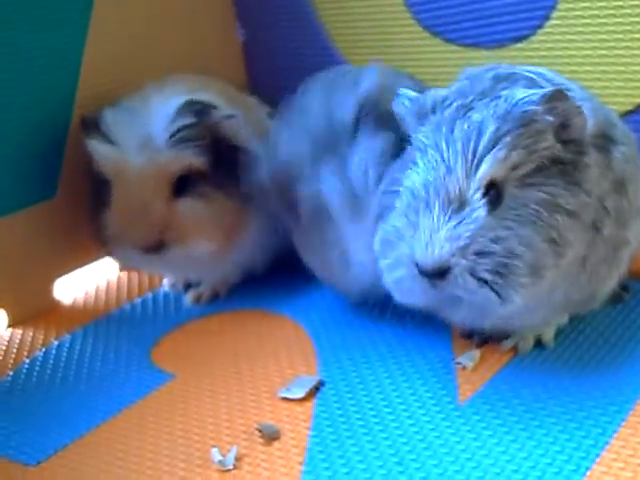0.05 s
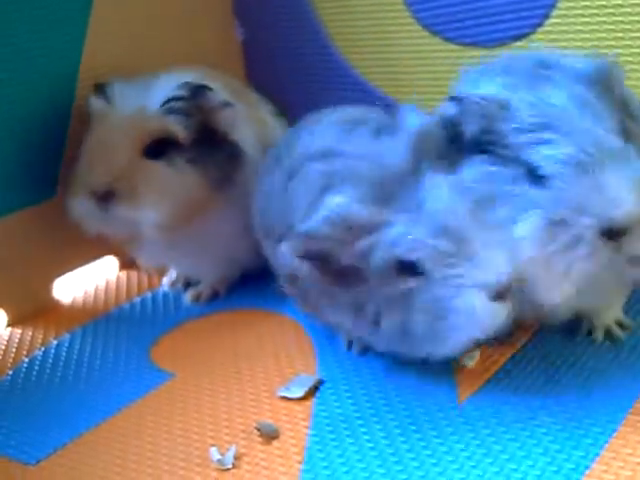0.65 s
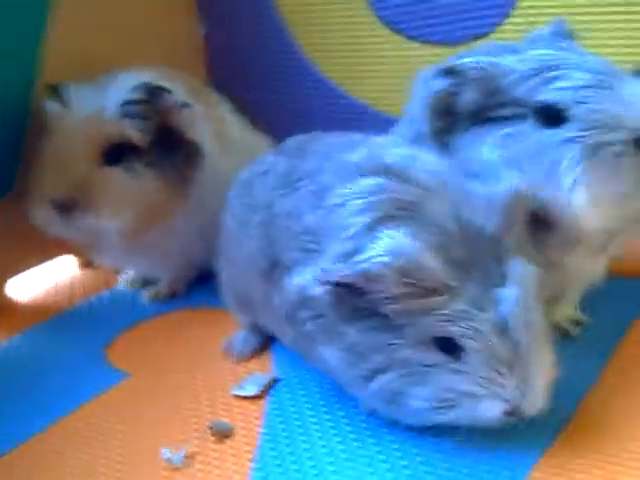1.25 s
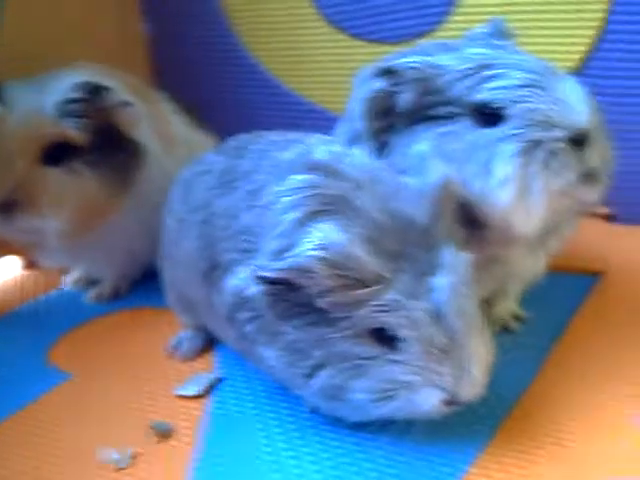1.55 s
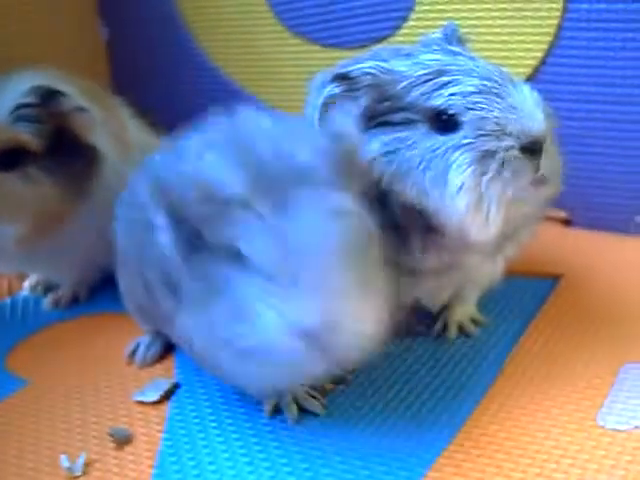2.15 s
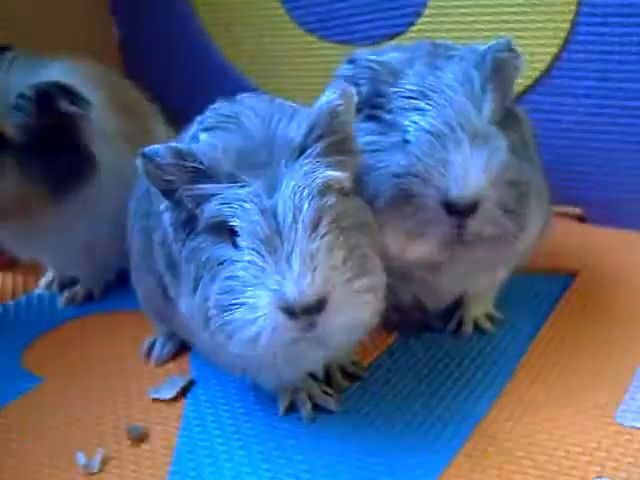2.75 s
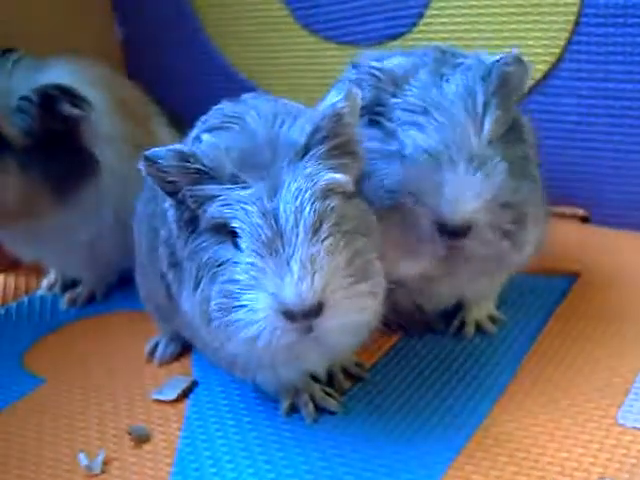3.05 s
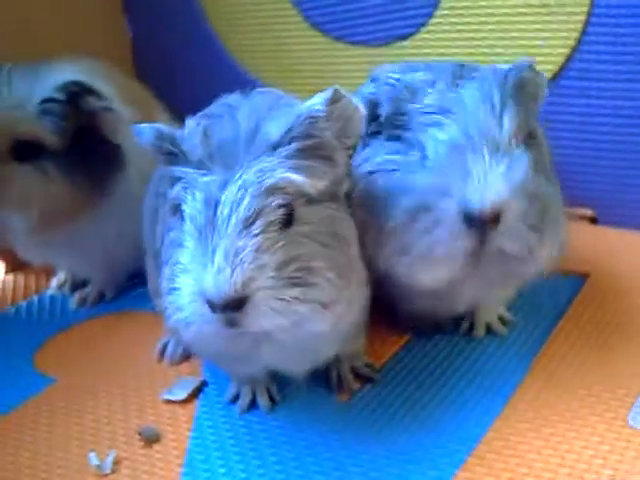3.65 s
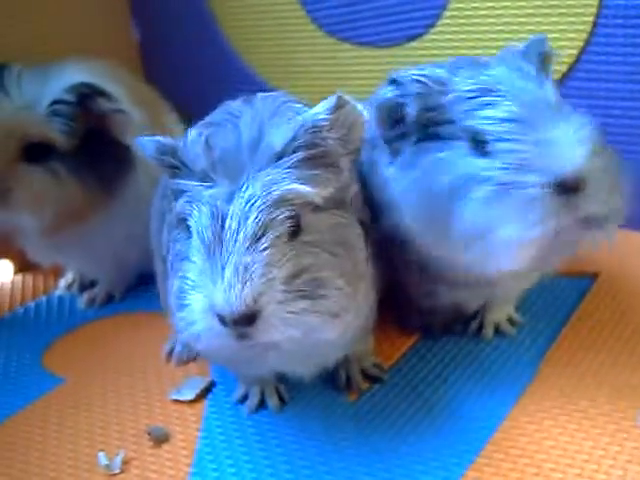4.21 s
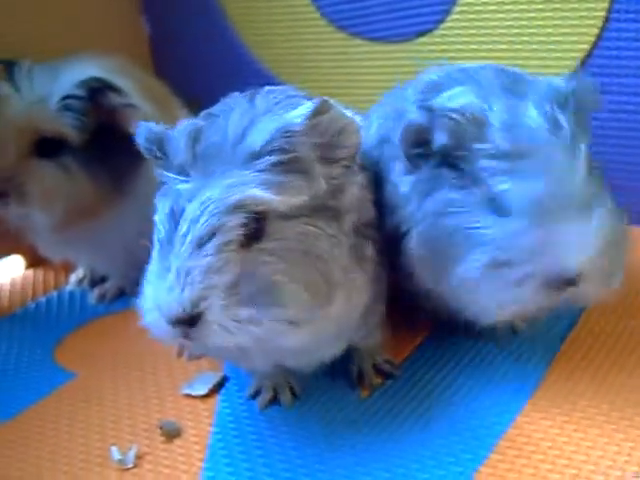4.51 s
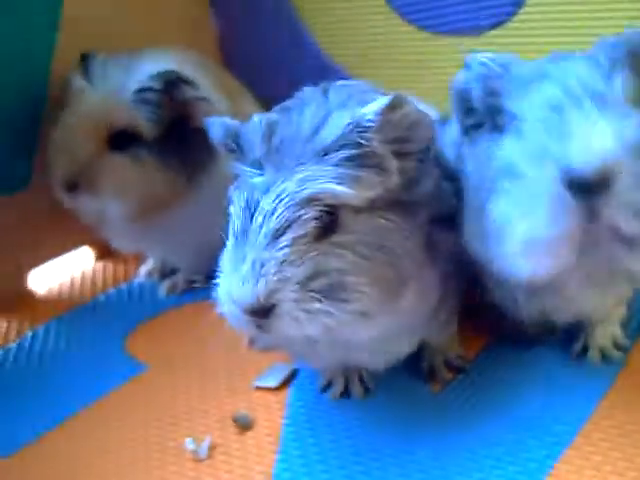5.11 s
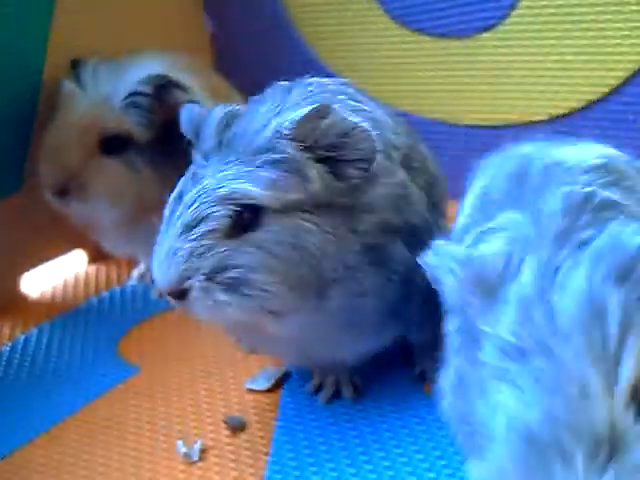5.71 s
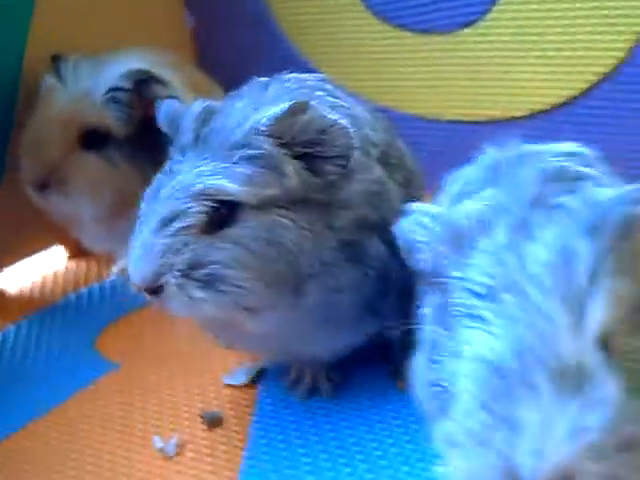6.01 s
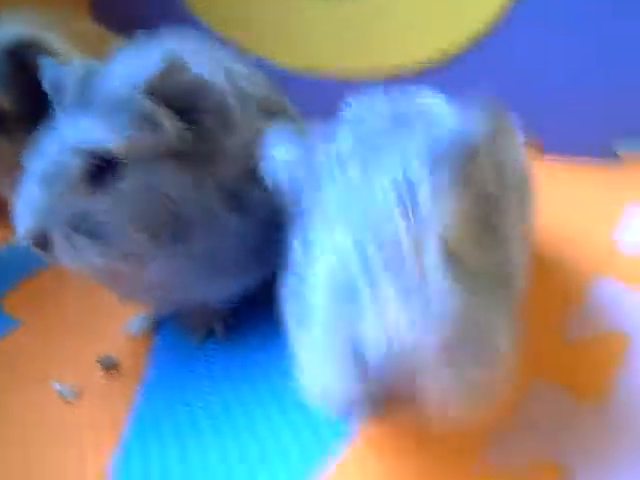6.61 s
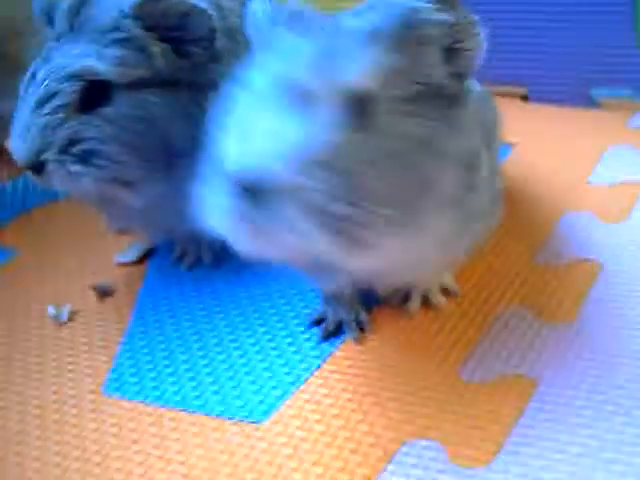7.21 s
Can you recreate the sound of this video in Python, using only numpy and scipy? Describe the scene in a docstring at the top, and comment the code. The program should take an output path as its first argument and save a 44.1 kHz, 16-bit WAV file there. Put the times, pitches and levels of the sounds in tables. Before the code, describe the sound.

Close up in a small foam-floored pen with very little echo, young guinea pigs give quick, overlapping, rising squeaks. They stop for a moment, then return in a longer, more eager run with shrill whistles and raspy notes. Near the end their feet shuffle dully on the mat and the squeaks become lower, quieter and more widely spaced. Steady room noise, a low hum and occasional faint ticks sit behind them.

```python
"""Young guinea pigs squeak over each other in a small foam-floored pen.
Each squeak is a stack of partials from trembling vocal folds: it dips, then sweeps up, the eager
ones into a piercing whistle. Uneven cycles and turbulent breath make some hoarse.
Under them lie a low hum, room noise, a thin high hiss, a few tiny ticks, one swell of rumble
and a soft shuffle of feet on the mat."""
import sys
import numpy as np
from scipy import signal
from scipy.fft import rfft, irfft, next_fast_len
from scipy.io import wavfile
from scipy.ndimage import uniform_filter1d

SR = 44100
rng = np.random.default_rng(int(sys.argv[2]) if len(sys.argv) > 2 else 0)


def materialize(psi):
    """Save the field psi as 16-bit PCM at rate SR to the path in sys.argv[1].

    A 1-D psi becomes a single channel; in a 2-D psi each row is a channel.
    """
    bounded = np.clip(np.atleast_2d(psi).T, -1, 1)
    quanta = np.round(bounded * 32767).astype(np.int16)
    wavfile.write(sys.argv[1], SR, quanta)


N = 324568
TIME_S = np.arange(N) / SR


def amp(db):
    """Decibels to gain."""
    return 10 ** (np.asarray(db) / 20)


def read_curve(points, hz):
    """Interpolate (frequency [Hz], value) points on a log-frequency axis."""
    point_hz, value = np.transpose(points)
    return np.interp(np.log(hz + 1), np.log(point_hz + 1), value)


def add(mix, start_s, sound):
    """Mix a sound in at start_s."""
    part = mix[max(round(start_s * SR), 0):][:len(sound)]
    part += sound[:len(part)]


def noise(gain):
    """Noise of rms 1, spectrum shaped by gain(hz)."""
    size = next_fast_len(N)
    spectrum = rfft(rng.standard_normal(size)) * gain(np.fft.rfftfreq(size, 1 / SR))
    x = irfft(spectrum, size)[:N]
    return x / np.sqrt(np.mean(x ** 2) + 1e-20)


def low_noise(top_hz):
    """Noise of rms 1, rolling off above top_hz."""
    return noise(lambda hz: 1 / (1 + (hz / top_hz) ** 4))


def hum(waver=0.0258, waver_hz=7.5, flutter_db=0.5, flutter_hz=4.8):
    """Low wavering drone that sags and swells once."""
    # drone contour: (time [s], pitch [Hz], level [dB])
    contour = [(0, 61, -51), (1.202, 59, -46), (1.352, 43, -43), (1.58, 44, -43), (1.72, 46, -48),
               (2.4, 51.5, -48.5), (5.2, 51, -50), (7.36, 51, -49)]
    # harmonics: (multiple, gain [dB])
    partials = [(1, -4), (2, -1), (3, -12.5)]
    time_s, pitch_hz, level_db = np.transpose(contour)
    hz = np.interp(TIME_S, time_s, pitch_hz) * (1 + waver * low_noise(waver_hz))
    phase = 2 * np.pi * np.cumsum(hz) / SR
    tone = sum(amp(db + flutter_db * low_noise(flutter_hz)) * np.sin(k * phase) for k, db in partials)
    return amp(np.interp(TIME_S, time_s, level_db)) * tone


def room_noise(level_db=-47):
    """Steady, bass-heavy room noise."""
    # noise spectrum: (frequency [Hz], relative density [dB])
    spectrum = [(12, -43), (20, -27), (38, 1.5), (59, -1.5), (75, -5.5), (103, -7.5), (200, -7), (268, -10),
                (593, -16.5), (733, -16), (980, -23), (1240, -27), (7140, -45.5), (7940, -43.5),
                (11200, -46), (14600, -92), (22000, -120)]
    return amp(level_db) * noise(lambda hz: amp(read_curve(spectrum, hz)))


def hiss(centre_hz=7880, width_hz=150, level_db=-77):
    """Thin band of electronic hiss."""
    return amp(level_db) * noise(lambda hz: 1 / (1 + ((hz - centre_hz) / width_hz) ** 4))


def gesture(t, length_s, dip_s, sweep_s, lateness, dip_hz, final_hz, bend, warble,
            dip_db, mid_db, final_db):
    """Squeak pitch and level: start sharp and soft, dip, sweep on an S-curve, hold or warble, let go."""
    sharp, soft_db, settle_s = 0.17, -2.5, 0.05
    warble_hz, bend_s = 25.03, 0.015
    break_hz, break_width_hz, break_jump_hz = 2038, 257, 125.5
    fade_db, fade_s = -2, 0.011
    unsettled = np.tanh((np.maximum(dip_s - t, 0) / settle_s) ** 2)
    progress = np.clip((t - dip_s) / sweep_s, 0, 1)
    climb = np.sin(np.pi / 2 * progress) ** lateness
    hz = dip_hz * (1 + sharp * unsettled) + (final_hz - dip_hz) * climb
    end_bend = bend * np.exp((t - length_s) / bend_s)
    wobble = warble * climb * np.cos(2 * np.pi * warble_hz * (t - dip_s - sweep_s))
    hz *= 1 + end_bend + wobble
    # the voice hurries across its register break, lingering on either side
    past_break = (hz - break_hz) / break_width_hz
    hz += break_jump_hz * past_break * np.exp(-past_break ** 2 / 2)
    level_db = np.interp(progress, [0.22, 0.42, 0.59, 1], [dip_db, mid_db, mid_db, final_db])
    return hz, level_db + soft_db * unsettled + fade_db * np.exp((t - length_s) / fade_s)


def squeak(row, unrest):
    """Vocal folds as gliding partials: rich and throaty when low, a buzzing whistle when high."""
    chest_hz, fast_octaves_per_s = 1150, 9
    tremble, hoarse_tremble, catch = 0.012, 0.01, 0.028  # shares of pitch
    chest_rolloff, whistle_rolloff, thin_db, halves_db = 2.62, 2.8, -1.5, -7.5
    buzz_hz, buzz_db, glide_buzz_db = 430, -20, 9
    shimmer_db, flutter_db, attack_s, release_s = 1.3, 3.5, 0.0088, 0.0012
    start_s, length_s, *shape, low_over_db, high_over_db, hoarse = row
    span = np.arange(int(start_s * SR), min(int((start_s + length_s) * SR), N))
    t = (span - span[0]) / SR
    hz, level_db = gesture(t, length_s, *shape)
    jitter, shimmer, rasp, stumble, flutter, upper_flutter = unrest[:, span]
    # fast sweeps unsteady pitch and level, and thin the overtones
    glide = np.tanh(abs(np.gradient(np.log2(hz))) * SR / fast_octaves_per_s)
    chest = 1 / (1 + (hz / chest_hz) ** 6)  # 1 in the low register, 0 in the whistle
    slack = (1 + chest) / 2  # taut folds tremble less
    hz *= 1 + slack * (tremble + hoarse_tremble * hoarse) * jitter + catch * glide * stumble
    phase = 2 * np.pi * np.cumsum(hz) / SR

    def partial(k):
        return np.sin(k * phase) * (k * hz < SR / 3)

    rolloff = chest * chest_rolloff + (1 - chest) * whistle_rolloff
    overtones = sum((k / 2) ** -rolloff * partial(k) * (1 if k < 4 else chest) for k in range(2, 8))
    register_db = chest * low_over_db + (1 - chest) * high_over_db
    overtones *= amp(register_db + thin_db * glide + flutter_db * upper_flutter)
    # uneven alternate cycles put lines halfway between the low partials
    halves = sum(partial(k) / (1 + (k / 3.1) ** 6) for k in np.arange(5) + 0.5)
    halves *= chest * hoarse * amp(halves_db + 2 * rasp)
    # a slower fold vibration gives the whistle sidebands, strongest in the sweep
    buzz_depth = (1 - chest) * amp(buzz_db + glide_buzz_db * glide + 2.7 * rasp)
    buzz_phase = 2 * np.pi * np.cumsum(buzz_hz * (1 + 0.109 * stumble)) / SR
    buzz = 1 + buzz_depth * np.sin(buzz_phase)
    gate = np.clip(t / attack_s, 0, 1) * np.clip((t[-1] - t) / release_s, 0, 1)
    flicker_db = slack * shimmer_db * shimmer + flutter_db * glide * flutter * (1 - chest / 2)
    return gate * buzz * amp(level_db + flicker_db) * (partial(1) + overtones + halves)


def breath(folds, gain_db, top_hz):
    """Turbulence that swells with the voice."""
    envelope = np.sqrt(abs(uniform_filter1d(folds ** 2, size=300)))
    return amp(gain_db) * envelope * low_noise(top_hz)


def guinea_pigs(gain_db=3):
    """All squeaks with their breath; hoarse ones carry more low turbulence."""
    # calls: (start [s], length [s], dip [s], sweep [s], sweep lateness [exponent], dip pitch [Hz],
    #   final pitch [Hz], end bend [share of pitch], warble [share of pitch],
    #   relative level in the dip [dB], in mid-sweep [dB], at the final pitch [dB],
    #   overtones when low [dB], overtones when high [dB], hoarseness [0 to about 1])
    squeaks = [(0.055, 0.31, 0.081, 0.2, 1.91, 806, 3120, 0.01, 0.054, -48, -48.5, -51, -3.5, -15, 0),
               (0.072, 0.12, 0.0025, 0.12, 3.6, 745, 2880, -0.0, 0.0045, -45, -49.5, -49, -5, -16, 0.4),
               (0.277, 0.12, 0.04, 0.092, 3.4, 687, 2700, 0.064, 0.074, -54.5, -46.5, -43.5, 0.5, -15, 0),
               (0.467, 0.13, 0.067, 0.055, 2.8, 687, 1985, 0.06, 0.0044, -41, -43, -51, -9, -15, 0.7),
               (0.481, 0.27, 0.065, 0.19, 2.28, 718, 2630, 0.13, 0.02, -44.5, -45, -51, -13.5, -6, 0.42),
               (0.686, 0.12, 0.046, 0.063, 3.3, 725, 1850, -0.31, 0.078, -43, -41.5, -41.5, -6, -16, 0.24),
               (0.858, 0.21, 0.086, 0.091, 4.1, 626, 2330, -0.4, 0.058, -43, -46.5, -46.5, -9, -12, 0.87),
               (0.891, 0.189, 0.056, 0.088, 3.05, 688, 1823, -0.062, 0.027, -39, -42, -44, -11, -11.5, 0.22),
               (1.071, 0.063, 0.0018, 0.028, 1.5, 2007, 2510, -0.39, 0.0089, -47, -59, -47.5, -14, -16, 0.079),
               (1.145, 0.181, 0.057, 0.088, 2.1, 641, 3250, 0.12, 0.0, -36.5, -44, -44.5, -12, -18, 0.04),
               (1.231, 0.19, 0.047, 0.17, 2.74, 711, 2185, -0.018, 0.056, -42.5, -48.5, -49, -13, -9, 0.73),
               (1.421, 0.078, 0.0019, 0.052, 2.5, 1730, 2700, -0.01, 0.022, -43, -51, -46, -8, -12, 0.3),
               (1.462, 0.13, 0.064, 0.042, 2.15, 644, 2290, -0.25, 0.0049, -38, -45.5, -52, -14, -6, 0),
               (1.577, 0.056, 0.0035, 0.039, 1.7, 1824, 2600, 0.071, 0.0, -50, -49, -44, -14, -14, 0.1),
               (2.23, 0.25, 0.023, 0.14, 2.2, 677, 4023, -0.068, 0.0072, -36, -42.5, -33.5, -16.5, -13, 0.04),
               (2.452, 0.085, 0.0024, 0.076, 3.9, 689, 1192, -0.21, 0.0, -46.5, -43, -50, -7.5, -3, 0.3),
               (2.549, 0.046, 0.0019, 0.018, 2.8, 950, 1650, -0.31, 0.034, -47, -49, -44.5, -8, -14, 0.1),
               (2.603, 0.28, 0.039, 0.22, 1.9, 654, 3700, 0.098, 0.0056, -36.5, -43.5, -37, -13, -12, 0.0),
               (2.713, 0.22, 0.035, 0.15, 2.2, 680.6, 2300, -0.093, 0.058, -45, -46, -46.5, -3, -14, 0.87),
               (2.877, 0.071, 0.01, 0.015, 2.5, 3615, 3676, -0.017, 0.0074, -25, -25.5, -26, -10, -9, 0.2),
               (3.058, 0.16, 0.072, 0.097, 2.63, 660, 1880, 0.17, 0.011, -42.5, -47.5, -36, -11, -16, 0.8),
               (3.109, 0.26, 0.04, 0.14, 2.5, 703.7, 3592, 0.027, 0.0091, -35.5, -39, -26.5, -10.5, -4, 0),
               (3.223, 0.071, 0.002, 0.03, 2.5, 1840, 1165, 0.059, 0.023, -33.5, -45, -43, -3, -13, 0.7),
               (3.416, 0.3, 0.047, 0.33, 2.95, 693, 3520, 0.08, 0.074, -44, -43.5, -33, -9.5, -11, 0.9),
               (3.497, 0.3, 0.04, 0.27, 2.33, 645, 3947, -0.05, 0.012, -38, -39, -46.5, -6, -11.5, 0.25),
               (3.778, 0.048, 0.0016, 0.066, 2.4, 940, 1730, 0.062, 0.0, -57, -52, -54, -14, -17, 0.1),
               (3.85, 0.3, 0.051, 0.23, 2.66, 693, 3280, 0.093, 0.0, -39.5, -43.5, -44.5, -10, -8.5, 0.87),
               (3.954, 0.29, 0.022, 0.255, 2.3, 654.4, 3863, -0.02, 0.0011, -37, -40.5, -44, -7, -14.5, 0),
               (4.048, 0.093, 0.027, 0.1, 3, 753, 1970, 0.024, 0.0, -52, -52.5, -54, -1, 8, 0.2),
               (4.24, 0.26, 0.049, 0.22, 2.54, 716, 2368, 0.22, 0.044, -37.5, -46.5, -37, -8.5, -7.5, 0.7),
               (4.393, 0.2905, 0.037, 0.212, 2.4, 689, 3771, -0.016, 0.0034, -39, -40.5, -24, -8, -9.5, 0.22),
               (4.623, 0.13, 0.062, 0.092, 5.4, 737, 2140, 0.21, 0.0, -38, -40, -41, -11, -11, 0.9),
               (4.848, 0.28, 0.048, 0.23, 2.4, 683, 3970, -0.068, 0.012, -41, -44.5, -45, -11.5, -15, 0.2),
               (4.882, 0.22, 0.04, 0.16, 2.45, 781, 2387, 0.23, 0.003, -39, -43.5, -45.5, -13.5, -6.5, 1.04),
               (5.206, 0.17, 0.041, 0.17, 2.46, 709.5, 1610, 0.061, 0.0, -36.5, -42, -40, -8.5, -16, 0.23),
               (5.268, 0.21, 0.027, 0.19, 2.15, 703, 3450, 0.0013, 0.042, -40, -47, -55.5, -15, -7, 0.4),
               (5.483, 0.12, 0.041, 0.11, 2.7, 697, 1068, 0.042, 0.0, -33, -36, -45, -10.5, -21, 0.1),
               (5.634, 0.22, 0.028, 0.2, 2.27, 658, 3450, -0.027, 0.0043, -40.5, -48, -44.5, -11, -10.5, 0.04),
               (5.758, 0.1, 0.027, 0.13, 3.02, 759, 1360, -0.094, 0.03, -36.5, -36, -49, -29, -23, 0.7),
               (6.061, 0.073, 0.031, 0.06, 2.6, 676, 1640, -0.028, 0.0, -50, -46, -58, -12, -19, 0),
               (6.485, 0.096, 0.012, 0.1, 2.17, 632, 1487, 0.024, 0.029, -52, -45, -69, -15, -16, 0),
               (6.856, 0.096, 0.022, 0.071, 2.05, 664, 1406, 0.0088, 0.0, -50, -45.5, -53, -11, -18, 0.2),
               (6.983, 0.056, 0.005, 0.018, 2.5, 724, 753, -0.0016, 0.0, -41, -44, -41, -18, -20, 0.15),
               (7.146, 0.099, 0.035, 0.081, 3.7, 658, 1680, -0.099, 0.024, -53.5, -43, -58, -10, -25, 0),
               (7.262, 0.069, 0.023, 0.056, 2.6, 754, 990, 0.0024, 0.021, -45.5, -41.5, -55, -13, -9, 0.06)]
    # drifts: jitter, shimmer, rasp, stumble, flutter, upper flutter
    unrest = np.array([low_noise(hz) for hz in (240, 240, 30, 60, 80, 70)])
    folds, rasping = np.zeros((2, N))
    for row in squeaks:
        start_s, *_, hoarse = row
        sound = amp(gain_db) * squeak(row, unrest)
        add(folds, start_s, sound)
        add(rasping, start_s, hoarse * sound)
    airy = breath(folds, gain_db=-30.5, top_hz=11500)
    husky = breath(rasping, gain_db=-18.5, top_hz=2240)
    return folds + airy + husky


def resonate(x, size=4096):
    """Resonances that ring on briefly after a partial sweeps through."""
    # response of throat, pen and microphone: (frequency [Hz], gain [dB])
    response = [(400, -2.5), (560, -19.5), (710, 4.5), (850, -10), (1000, 6), (1190, -8.5), (1480, 1.5),
                (2230, -6), (2800, -19), (3700, -5), (4250, -4), (4600, -3), (5200, -8), (7300, -20.5),
                (8100, -16.5), (10800, 0)]
    log_gain = np.log(amp(read_curve(response, abs(np.fft.fftfreq(size, 1 / SR)))))
    minimum_phase = np.exp(signal.hilbert(log_gain).conj())
    ring = np.fft.ifft(minimum_phase).real[:size // 2]
    return signal.fftconvolve(x, ring)[:N]


def pen_echoes(x, early_db=-18, early_decay_s=0.02, room_db=-27):
    """Add quick reflections off the pen walls and a faint room tail."""
    # room decay: (frequency [Hz], T60 [s])
    room_t60 = [(300, 0.11), (1500, 0.24), (4000, 0.075), (11000, 0.017)]
    t = np.arange(SR // 2) / SR
    early = rng.standard_normal(len(t)) * (t > 0.002) * np.exp(-t / early_decay_s)
    diffuse = rng.standard_normal(len(t)) * (t > 0.008)
    hz, age_s, bands = signal.stft(diffuse, SR, nperseg=256)
    bands *= amp(-60 * age_s / read_curve(room_t60, hz)[:, None])
    tail = signal.istft(bands, SR, nperseg=256)[1][:len(t)]
    echoes = amp(early_db) * early / np.linalg.norm(early) + amp(room_db) * tail / np.linalg.norm(tail)
    return x + signal.fftconvolve(x, echoes)[:N]


def ticks(gain_db=3.02, decay_s=0.00056):
    """Tiny broadband snaps, about a millisecond each."""
    # snaps: (time [s], relative peak [dB])
    snaps = [(0.113, -45), (1.0802, -45), (1.602, -37), (1.942, -41.5), (2.8294, -33.5), (2.9867, -39),
             (4.7371, -33), (4.92, -38), (5.494, -42), (5.966, -43), (6.875, -42)]
    t = np.arange(400) / SR
    out = np.zeros(N)
    for start_s, peak_db in snaps:
        snap = rng.standard_normal(len(t)) * np.exp(-t / decay_s)
        add(out, start_s, amp(peak_db + gain_db) * snap / abs(snap).max())
    return out


def rumble(peak_s=1.4, width_s=0.2, top_hz=55, level_db=-46):
    """One soft swell of deep rumble."""
    swell = np.exp(-((TIME_S - peak_s) / width_s) ** 2)
    return amp(level_db) * swell * low_noise(top_hz)


def shuffle(thud_hz=145, width_hz=35):
    """Feet moving on the foam mat: dull low thuds."""
    # movement on the mat: (time [s], level [dB])
    movement = [(5.3, -60), (5.502, -52), (5.75, -49.5), (6.05, -70)]
    time_s, level_db = np.transpose(movement)
    envelope = np.interp(TIME_S, time_s, amp(level_db), left=0, right=0)
    return envelope * noise(lambda hz: 1 / (1 + ((hz - thud_hz) / width_hz) ** 2))


def scene():
    """Voices and ticks in the pen over the background, mono."""
    in_pen = pen_echoes(resonate(guinea_pigs()) + ticks())
    return (in_pen + shuffle() + rumble() + hum() + room_noise() + hiss())[None]


def record(dry):
    """Steep low-pass band limit."""
    cutoff_hz = 11180
    lowpass = signal.firwin(1023, cutoff_hz, window=("kaiser", 8), fs=SR)
    return signal.oaconvolve(dry, lowpass[None], "same")


dry = scene()
out = record(dry)
materialize(out)
```